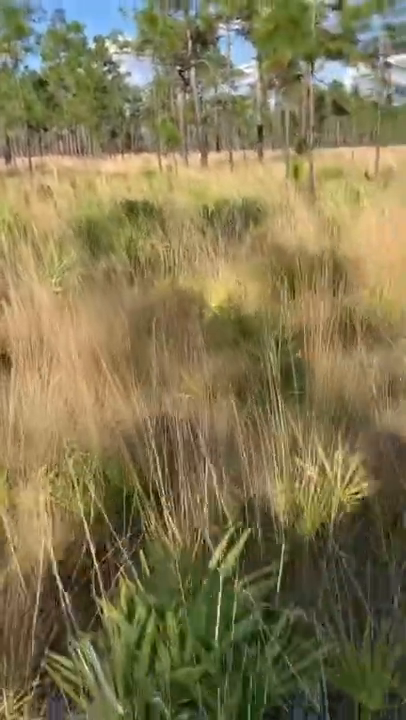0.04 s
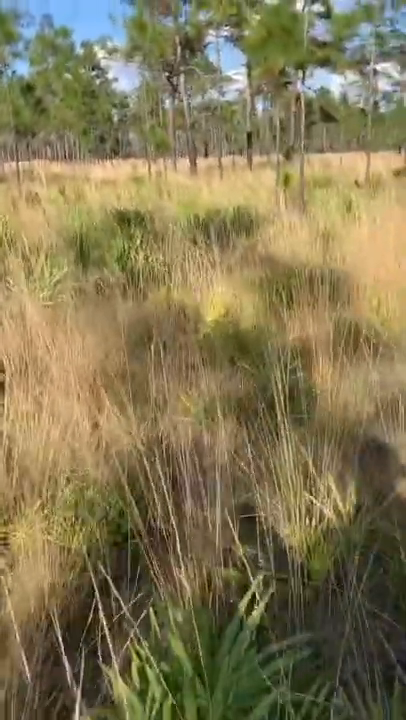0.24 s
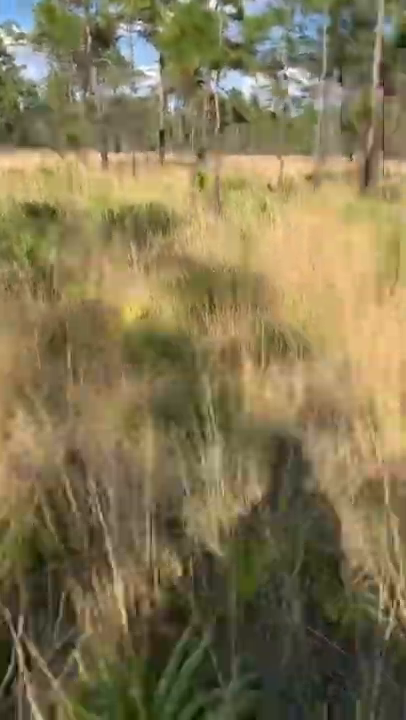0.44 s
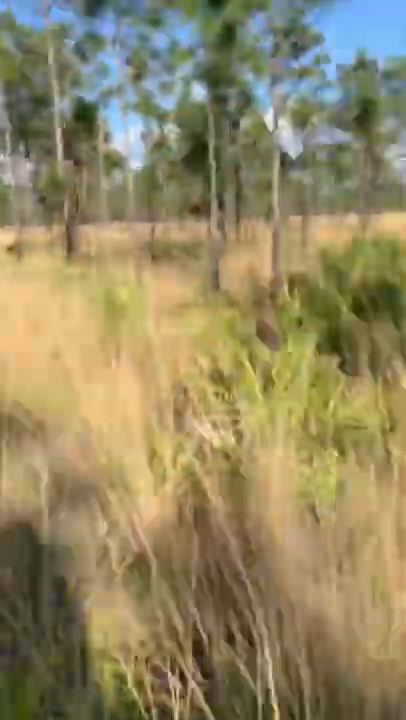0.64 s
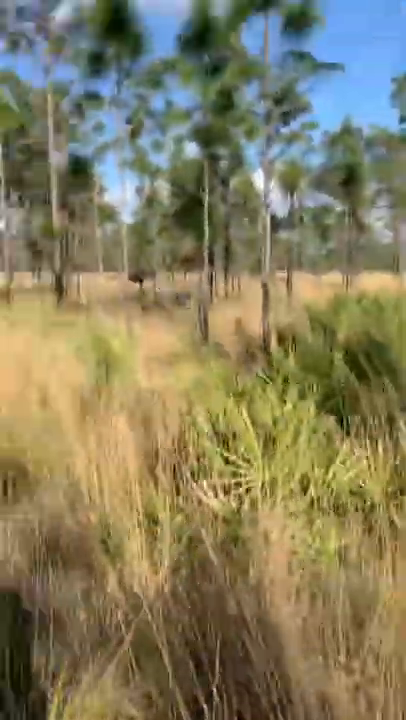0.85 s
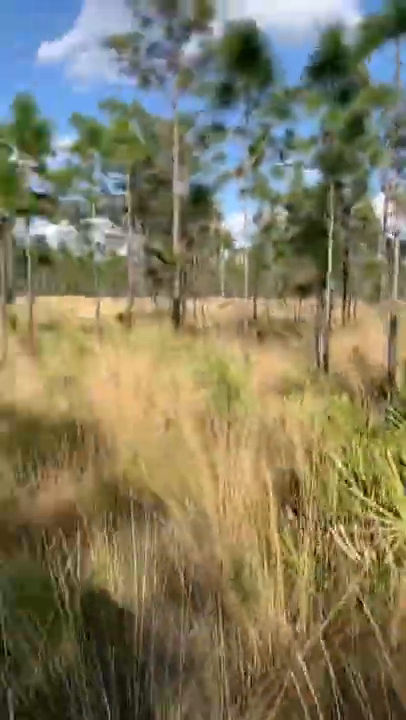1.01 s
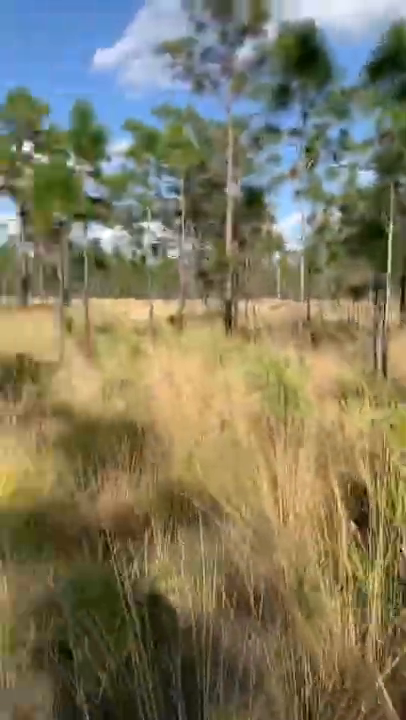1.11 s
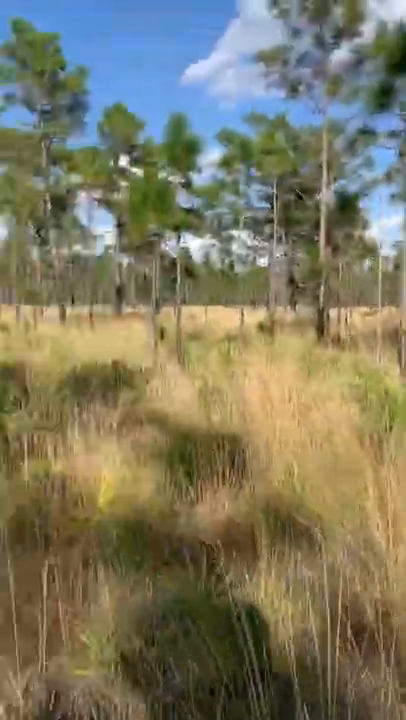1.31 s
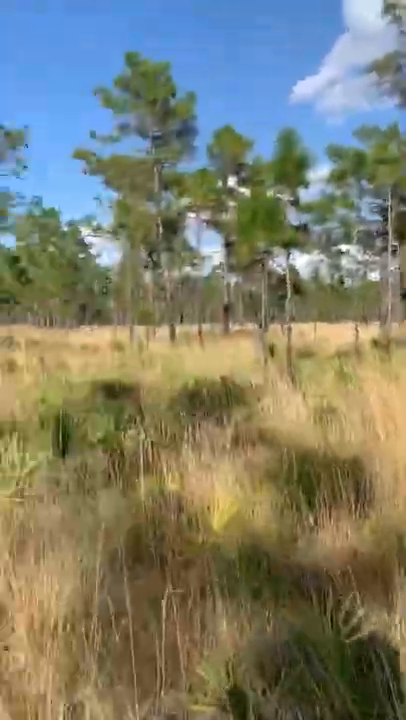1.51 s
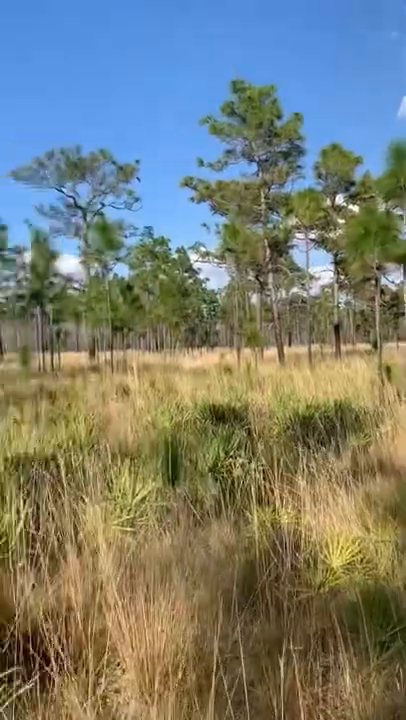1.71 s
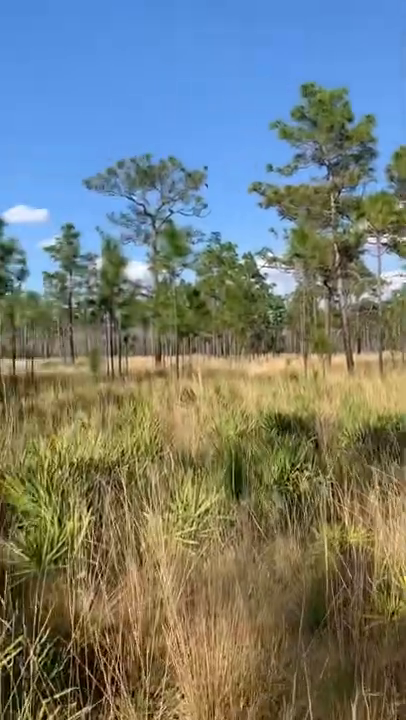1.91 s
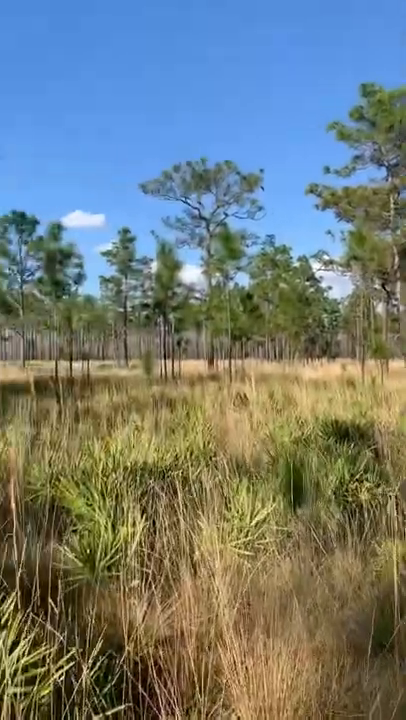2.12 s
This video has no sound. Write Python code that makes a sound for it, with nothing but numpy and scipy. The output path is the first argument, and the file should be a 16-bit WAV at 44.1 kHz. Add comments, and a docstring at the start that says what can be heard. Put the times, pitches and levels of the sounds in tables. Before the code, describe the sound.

Rapid, fading wingbeats of a quail bursting from swishing, snapping dry grass.

```python
"""A quail bursts out of dry grass and whirrs away: about 25 wingbeats a second, each a short falling whoop
with a hiss of feathers, over a low throb of pushed air. The ground reflection hollows out the whirr once
the bird is up. Someone wades through the grass: stalks swish and snap, and a boot lands. A bird gives
thin, mostly rising peeps. The open field returns very little."""
import sys
import numpy as np
from scipy import signal
from scipy.fft import rfft, irfft, next_fast_len
from scipy.io import wavfile
from scipy.ndimage import uniform_filter1d, map_coordinates

SR = 44100
rng = np.random.default_rng(int(sys.argv[2]) if len(sys.argv) > 2 else 0)


def inscribe(sig):
    """Save sig as 16-bit PCM at rate SR to the path in sys.argv[1].

    A 1-D sig is mono; a 2-D sig holds one channel per row.
    Samples are clipped to [-1, 1] before scaling.
    """
    pcm = np.round(np.clip(np.atleast_2d(sig).T, -1, 1) * 32767)
    wavfile.write(sys.argv[1], SR, pcm.astype(np.int16))


N = 94815

# wing downstrokes: (time [s], relative level [dB], pitch [Hz], length [ms], relative hiss level [dB])
DOWNSTROKES = [(0.2602, -31.5, 844, 4.6, -52), (0.302, -34.5, 1010, 5, -54), (0.3415, -28, 905, 6.2, -66),
               (0.3853, -20.5, 860, 4.6, -66), (0.4265, -15.5, 846, 4.4, -44),
               (0.465, -25.5, 920, 6.3, -38.5), (0.5051, -21.5, 1010, 4.4, -42),
               (0.5457, -23.5, 980, 3.9, -54), (0.5864, -33.5, 893, 7, -47),
               (0.625, -15.5, 929, 7.9, -38.5), (0.6662, -21, 914, 4.5, -55),
               (0.706, -27.5, 870, 6.3, -37.5), (0.743, -26, 1015, 5, -44), (0.7823, -27.5, 1050, 6.2, -49),
               (0.8221, -26, 1040, 5.9, -55.5), (0.8623, -28, 1034, 6, -47.5),
               (0.9026, -25.5, 973, 5.8, -49.5), (0.943, -27, 1004, 5.5, -47.5),
               (0.9832, -32, 983, 5.2, -50), (1.023, -30, 1004, 5.7, -58), (1.0635, -33, 980, 6.1, -54),
               (1.1032, -32.5, 997, 5.9, -60.5), (1.1452, -34, 963, 4.7, -64),
               (1.1845, -33.5, 1000, 5, -59), (1.2267, -32.5, 980, 4.7, -57),
               (1.269, -41.5, 970, 5.8, -50.5), (1.312, -47, 960, 5, -65), (1.353, -47, 990, 7.9, -65),
               (1.3936, -42.5, 1020, 6.2, -58), (1.436, -46.5, 1030, 5.3, -57.5),
               (1.479, -48, 950, 6.4, -72)]
# swell and fade of the air pushed by the wings: (time [s], level [dB])
THROB_LEVEL = [(.24, -102), (.268, -65.5), (.288, -41.5), (.36, -40), (.53, -39.5), (.72, -42.5), (.8, -48),
               (.92, -46.5), (1.2, -54), (1.42, -59), (1.6, -61), (1.78, -68.5), (1.87, -58.5), (2.0, -73),
               (2.15, -62.5)]
# bright colour of dry grass blades: (frequency [Hz], gain [dB])
BLADE_COLOUR = [(60, -57.5), (300, -4), (1000, -14.5), (2000, -6), (4000, -7.5), (7000, -3.5),
                (11000, -2.5), (15500, -2)]
PEAK_SHAPE = 1.3  # of a stroke's envelope: 1 is pointed, 2 is a bell
JITTER_RAD = 0.072  # phase roughness of the wing tones


def amp(db):
    """Decibels to gain."""
    return 10 ** (np.asarray(db) / 20)


def unit(x):
    """Scale to rms 1."""
    return x / np.sqrt(np.mean(x ** 2) + 1e-20)


def clock():
    """Time of every sample in seconds."""
    return np.arange(N) / SR


def along(points, hz):
    """Read (frequency, value) points on a log axis."""
    freqs, values = np.transpose(points)
    return np.interp(np.log(hz + 1), np.log(freqs + 1), values)


def level(rows):
    """A fader ride: gain per sample from (time [s], level [dB]) points."""
    return amp(np.interp(clock(), *np.transpose(rows)))


def wobble(rate):
    """A smooth random curve with rate knots a second."""
    return map_coordinates(rng.standard_normal(8192), [clock() * rate], mode="wrap")


def filtered(x, response):
    """Shape x with a frequency response."""
    size = next_fast_len(N + 8192)
    return irfft(rfft(x, size) * response(np.fft.rfftfreq(size, 1 / SR)), size)[..., :N]


def noise(colour, grain=1, width_db=-16.5):
    """Coloured stereo noise of rms 1; grain roughens it before the EQ, width is side over mid."""
    mid, side = rng.standard_normal((2, N)) * grain
    pair = mid + amp(width_db) * np.array([side, -side])
    return unit(filtered(pair, lambda hz: amp(along(colour, hz))))


def burst(s, rise_s, decay_s, power=1):
    """An envelope that swells to 1 at time s and dies away."""
    t = clock() - s
    return np.exp(-(np.abs(t) / np.where(t < 0, rise_s, decay_s)) ** power)


def chirp(s, hz, jitter, fall_oct, fall_s=0.0021):
    """A tone of rms 1 that falls through hz at time s, from fall_oct above to fall_oct below."""
    t = clock()
    pitch = hz * 2 ** (-fall_oct * np.tanh((t - s) / fall_s))
    turns = np.cumsum(pitch) / SR
    return np.sqrt(2) * np.sin(2 * np.pi * (turns - np.interp(s, t, turns)) + jitter)


def crackle(ticks_per_s=110, spread_db=3):
    """Dry blades give sparse ticks of random size, rms 1."""
    chance, size = rng.random(N), rng.standard_normal(N)
    ticks = (chance < ticks_per_s / SR) * amp(spread_db * np.clip(size, -2, 2))
    return noise(BLADE_COLOUR, uniform_filter1d(ticks, size=24))


def grass():
    """Blades swish and tick; stalks scrape in tiny grains as they are pushed aside."""
    # swish of the blades: (time [s], level [dB])
    swish_level = [(0, -69), (.09, -79), (.12, -58.5), (.16, -73), (.2, -70), (.235, -42.5), (.31, -44.5),
                   (.34, -51), (.41, -46.5), (.49, -45.5), (.57, -54), (.635, -44.5), (.72, -56.5),
                   (.9, -73.5), (1.165, -82), (1.185, -54), (1.29, -52), (1.37, -58.5), (1.43, -72),
                   (1.475, -73), (1.51, -53), (1.58, -68), (1.68, -79.5), (1.81, -77.5), (1.85, -68),
                   (1.98, -81.5), (2.03, -69), (2.1, -55), (2.15, -53)]
    # scrape of the stalks: (time [s], level [dB])
    scrape_level = [(0, -80.5), (.19, -70), (.25, -45), (.33, -49), (.39, -43.5), (.47, -47), (.55, -48),
                    (.64, -46), (.76, -55.5), (1.0, -64.5), (1.2, -66.5), (1.3, -63.5), (1.46, -65),
                    (1.51, -47), (1.56, -56.5), (1.65, -64), (1.8, -66), (1.86, -67), (1.96, -71.5),
                    (2.15, -65)]
    # darker colour of the stalks: (frequency [Hz], gain [dB])
    stalk_colour = [(50, -46), (200, -3), (400, 3), (700, -7), (1000, -7), (1400, -5), (2000, -7),
                    (3000, -11), (5000, -13.5), (12000, -35)]
    swish = noise(BLADE_COLOUR, grain=amp(0.41 * wobble(1300) + 2.0 * wobble(90)))
    swish += amp(-6) * crackle()
    scrape = noise(stalk_colour, grain=amp(2.08 * wobble(700) + 1.5 * wobble(70)), width_db=-24.5)
    return level(swish_level) * swish + level(scrape_level) * scrape


def buffeting():
    """Air and handling buffet the microphone with a wide, low rumble."""
    # surges of the rumble: (time [s], level [dB])
    rumble_level = [(0, -75), (.1, -66), (.215, -70.5), (.275, -43.5), (.35, -44.5), (.5, -52), (.64, -46),
                    (.72, -53.5), (.85, -52.5), (.93, -57.5), (1.4, -66), (1.6, -63.5), (2.15, -69)]
    # bass-heavy colour: (frequency [Hz], gain [dB])
    rumble_colour = [(20, -21.5), (45, 1), (90, 7), (170, -2.5), (280, -4), (450, -17), (900, -39)]
    return level(rumble_level) * noise(rumble_colour, width_db=-7)


def snaps():
    """Single stalks break with a bright crack and a woody body."""
    # breaking stalks: (time [s], crack level [dB], body level [dB], decay [s])
    breaks = [(0.043, -60, -67.5, 0.0017), (0.117, -58, -81, 0.0045), (0.211, -48.5, -82, 0.0092),
              (.271, -31, -73, 0.0096), (0.306, -35, -59, 0.015), (0.351, -35.5, -43, 0.014),
              (0.391, -29, -47, 0.0092), (0.458, -35.5, -37.5, 0.0045), (0.473, -55, -37, 0.0029),
              (0.662, -61, -43, 0.0036), (0.693, -67, -48, 0.012), (0.821, -51.5, -50.5, 0.0032),
              (0.982, -55.5, -75, 0.0015), (1.061, -72.5, -79, 0.0015), (1.179, -53, -74, 0.011),
              (1.489, -49, -54, 0.0043), (1.507, -57.5, -43, 0.0024), (1.836, -63, -50.5, 0.011),
              (1.883, -61.5, -55.5, 0.0042)]
    # woody body of a stalk: (frequency [Hz], gain [dB])
    wood_colour = [(60, -46), (300, -32.5), (850, -20.5), (1400, -5), (2000, 5), (3200, -1.5), (5000, -2),
                   (12000, -43.5)]
    crack = sum(amp(db) * burst(s + 0.0012, 0.00024, decay) for s, db, _, decay in breaks)
    body = sum(amp(db) * burst(s + 0.00048, 0.0051, decay) for s, _, db, decay in breaks)
    return crack * noise(BLADE_COLOUR, grain=amp(2.1 * wobble(1500))) + body * noise(wood_colour)


def wingbeats():
    """Each downstroke is a falling whoop with flutter and feather hiss; the ground reflects them."""
    # a longer stroke holds its pitch better: (length [ms], fall to each side of centre [octaves])
    pitch_fall = [(5.5, 0.25), (6.5, 0.13)]
    # breathy midrange of a stroke: (frequency [Hz], gain [dB])
    flutter_colour = [(300, -16.5), (550, -14.5), (800, 5.5), (1050, -7.5), (1400, -6), (2000, -38.5),
                      (4000, -37.5)]
    # hiss of the feathers: (frequency [Hz], gain [dB])
    feather_colour = [(200, -58), (500, -37.5), (900, -28), (1350, 1), (1900, 6), (2700, 0.5), (4000, -6.5),
                      (7000, -22), (15000, -48.5)]
    whoops, stroke_env, hiss_env = np.zeros((3, N))
    jitter = JITTER_RAD * wobble(600)
    for s, db, hz, ms, hiss_db in DOWNSTROKES:
        length = ms / 1000
        envelope = amp(db) * burst(s, 0.52 * length, 0.71 * length, PEAK_SHAPE)
        fall_oct = np.interp(ms, *np.transpose(pitch_fall))
        whoops += envelope * chirp(s, hz, jitter, fall_oct)
        stroke_env += envelope
        hiss_env += amp(hiss_db) * burst(s, rise_s=0.0072, decay_s=0.0053)
    flutter = stroke_env * noise(flutter_colour, width_db=-8)
    hiss = hiss_env * noise(feather_colour, width_db=-15.5)
    direct = amp(-4) * whoops + amp(-11.5) * flutter + amp(-1.5) * hiss
    return direct + ground_reflection(direct)


def throb(lag_s=0.01452, cruise_hz=23.4, waver_db=0.23):
    """Pushed air pulses just behind each stroke and carries on after the whoops are too far to hear."""
    # harmonics of the air pulse: (multiple of the wing rate, relative level [dB])
    harmonics = [(2, -12), (3, 6.5), (4, 1), (5, -14), (6, -22)]
    t = clock() - lag_s
    times = np.array(DOWNSTROKES)[:, 0]
    beyond_strokes = t - np.clip(t, times[0], times[-1])
    turns = np.interp(t, times, np.arange(len(times))) + cruise_hz * beyond_strokes
    wave = sum(-amp(db + waver_db * wobble(11.0)) * np.cos(2 * np.pi * k * turns) for k, db in harmonics)
    return level(THROB_LEVEL) * unit(wave)


def puffs(pitch_hz=251.4, lag_s=0.0061, length_s=0.0055):
    """Each downstroke shoves out a short, low puff that fades with the throb."""
    jitter = JITTER_RAD * wobble(110)
    train = np.zeros(N)
    for s in np.array(DOWNSTROKES)[:, 0] + lag_s:
        tone = chirp(s, pitch_hz, jitter, fall_oct=0.37, fall_s=length_s)
        train += burst(s, length_s, length_s, PEAK_SHAPE) * tone
    return amp(-8.5) * level(THROB_LEVEL) * train


def wing_brushes(rise_s=0.0067):
    """The wings scrape through the grass at take-off."""
    # wing strikes on grass: (time [s], level [dB], decay [s])
    strikes = [(0.274, -38.5, 0.006), (0.355, -37, 0.012), (0.399, -37.5, 0.017)]
    # midrange colour of the scrape: (frequency [Hz], gain [dB])
    brush_colour = [(300, -31), (600, -10.5), (800, 7), (1100, -0.5), (1450, 5), (2000, -20), (5000, -30.5)]
    envelope = sum(amp(db) * burst(s, rise_s, decay) for s, db, decay in strikes)
    return envelope * noise(brush_colour, width_db=-4)


def cracks():
    """A stiff stalk breaks clean through with one very short, bright tick."""
    # clean breaks: (time [s], level [dB])
    breaks = [(0.276, -28.5), (0.2794, -27), (0.3517, -34), (0.393, -19.5), (0.4603, -27), (0.66, -38),
              (1.508, -45)]
    envelope = sum(amp(db) * burst(s, rise_s=0.00013, decay_s=0.00048) for s, db in breaks)
    return envelope * noise(BLADE_COLOUR)


def squeaks(length_s=0.0037):
    """Stiff feathers give short falling squeaks during the hard climb."""
    # feather squeaks: (time [s], level [dB], pitch [Hz])
    cues = [(0.494, -38.5, 1870), (0.555, -39, 1750), (0.587, -37, 1560), (0.693, -40, 2680),
            (0.728, -44.5, 1820), (.789, -43.5, 1700)]
    jitter = JITTER_RAD * wobble(410)
    out = np.zeros(N)
    for s, db, hz in cues:
        out += amp(db) * burst(s, length_s, length_s, PEAK_SHAPE) * chirp(s, hz, jitter, fall_oct=0.1)
    return out


def ground_reflection(x, clear_s=0.68, fade_s=0.02):
    """The ground bounce makes the whirr hollow; as its lag shortens, the colour rises."""
    # lag of the bounce behind the direct sound: (time [s], lag [ms])
    lag_ms = [(.65, 3.57), (.85, 3.85), (1.05, 3.72), (1.16, 3.4), (1.28, 3.13), (1.45, 2.72)]
    t = clock()
    delay_s = np.interp(t, *np.transpose(lag_ms)) / 1000
    fade_in = .5 + .5 * np.tanh((t - clear_s) / fade_s)  # the bird clears the grass
    return amp(-3.5) * np.array([map_coordinates(fade_in * side, [(t - delay_s) * SR]) for side in x])


def peeps(pitch_waver=0.0237, roughness_db=4.4):
    """A bird gives thin, rough whistles, most of them rising."""
    # bird calls: (time [s], length [s], start pitch [Hz], end pitch [Hz], level [dB])
    calls = [(0.884, 0.033, 2284, 2190, -36), (0.908, 0.14, 2345, 2610, -56.5),
             (1.376, .075, 1900, 2180, -66.5), (1.436, 0.058, 2270, 2230, -55.5),
             (1.506, 0.024, 2423, 2460, -45), (1.619, 0.14, 1273, 1480, -67),
             (1.97, 0.16, 1980, 2460, -63.5)]
    out = np.zeros(N)
    for s, length, start_hz, end_hz, db in calls:
        progress = np.clip((clock() - s) / length, 0, 1)
        pitch = (start_hz + (end_hz - start_hz) * progress) * (1 + pitch_waver * wobble(260))
        envelope = amp(db + roughness_db * wobble(90)) * np.sin(np.pi * progress)
        out += envelope * np.sin(2 * np.pi * np.cumsum(pitch) / SR)
    return out


def footfall():
    """A boot lands on soft soil."""
    # heel, then sole: (time [s], level [dB])
    thuds = [(1.485, -46), (1.512, -46)]
    # dull colour of soil: (frequency [Hz], gain [dB])
    soil_colour = [(40, -24), (110, -15), (200, 7.5), (350, -5), (600, -29), (1500, -28)]
    envelope = sum(amp(db) * burst(s, rise_s=0.0011, decay_s=0.014) for s, db in thuds)
    return envelope * noise(soil_colour)


def field_scatter(x):
    """Grass and pines scatter the sound into a very short tail."""
    # reverb time of the field: (frequency [Hz], time to fall 60 dB [s])
    decay_times = [(100, .08), (1000, 0.13), (4000, 0.051), (15000, 0.021)]
    hz, t, spectra = signal.stft(rng.standard_normal((2, SR // 2)), SR, nperseg=256)
    decay = amp(-60 * t / along(decay_times, hz)[:, None])
    tail = signal.istft(spectra * decay, SR, nperseg=256)[1]
    return signal.fftconvolve(x, tail / np.linalg.norm(tail[0]), axes=1)[:, :N]


def scene():
    """The bird with a touch of field reverb; its low air, the grass and the walker stay dry."""
    bird = wingbeats() + squeaks() + peeps()
    bird += amp(-19) * field_scatter(bird)
    wing_wash = throb() + puffs() + wing_brushes()
    return bird + wing_wash + grass() + buffeting() + snaps() + cracks() + footfall()


def record(dry, top_hz=15900):
    """The microphone pair shifts phase and level between the sides and cuts off the highest treble."""
    # phase between the sides: (frequency [Hz], lead of left over right [rad])
    phase_lead = [(0, 0), (130, .2), (270, 2.1), (520, 2.5), (800, 1.9), (1150, 1.8), (1640, .9),
                  (2410, 1.7), (3530, 1.3), (4310, 2.9), (5170, 3.3), (6290, 6.2), (7490, 6.3), (8350, 9.3),
                  (9560, 9.6), (10400, 12.5), (11600, 12.6), (12500, 15.6), (13700, 15.7), (14600, 18.6),
                  (15900, 18.9)]
    # balance of the sides: (frequency [Hz], left minus right [dB])
    balance = [(60, -6), (110, -6), (200, -10), (380, 0), (700, 0.1), (4000, 0)]
    side = np.array([[.5], [-.5]])

    def response(hz):
        gain = amp(side * along(balance, hz))
        phase = side * np.interp(hz, *np.transpose(phase_lead))
        return gain * np.exp(1j * phase) * (hz < top_hz)

    return filtered(dry, response)


dry = scene()
out = record(dry)
inscribe(out)
```